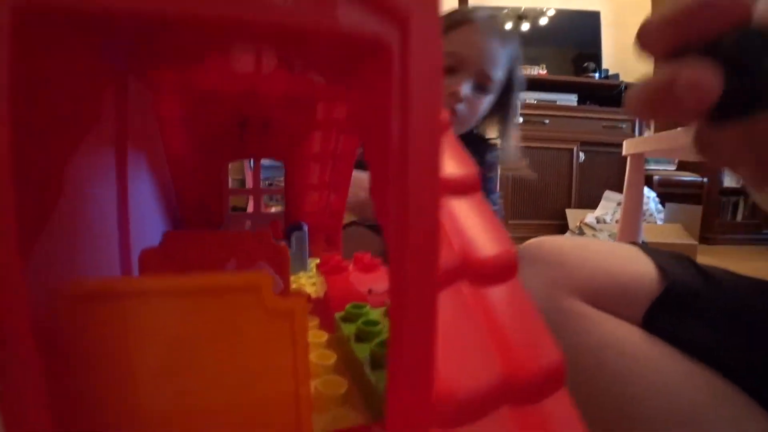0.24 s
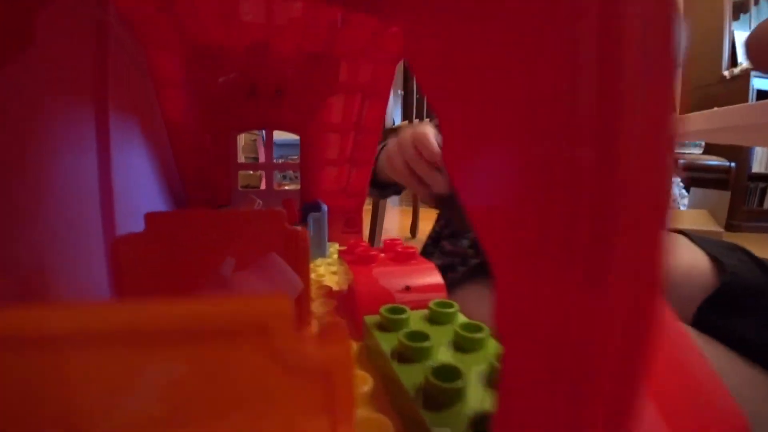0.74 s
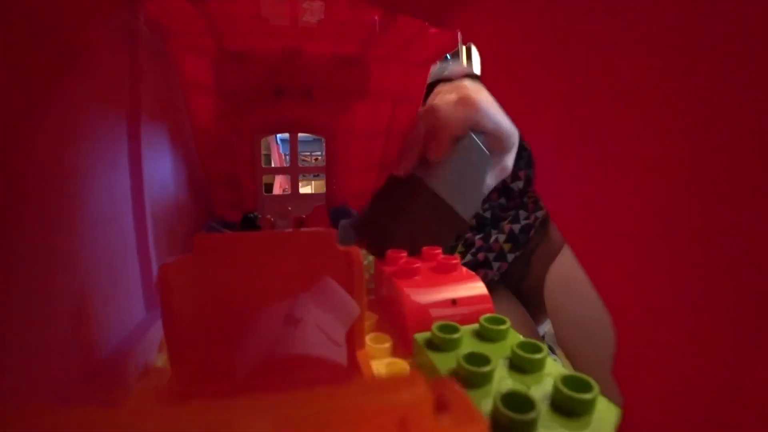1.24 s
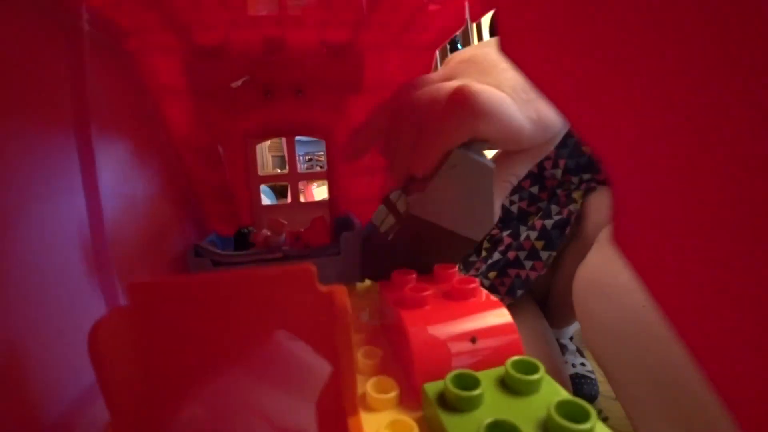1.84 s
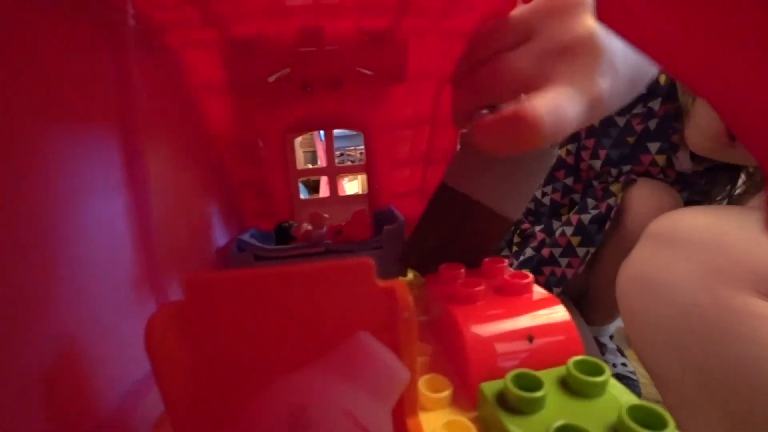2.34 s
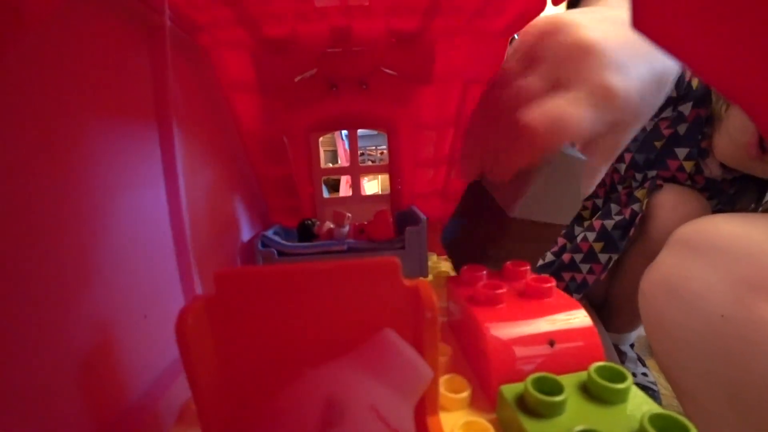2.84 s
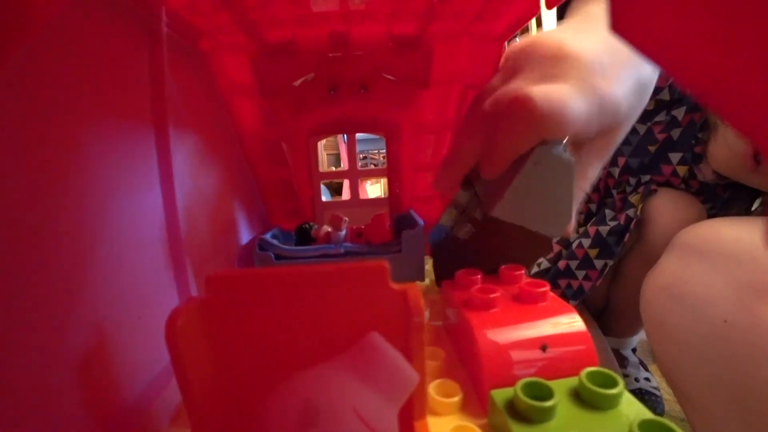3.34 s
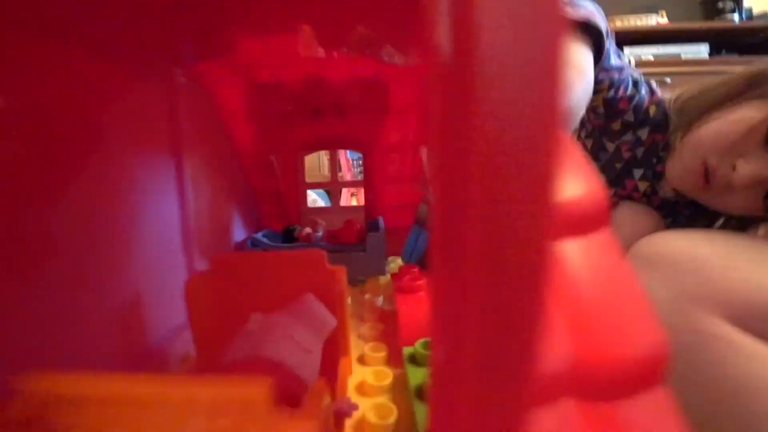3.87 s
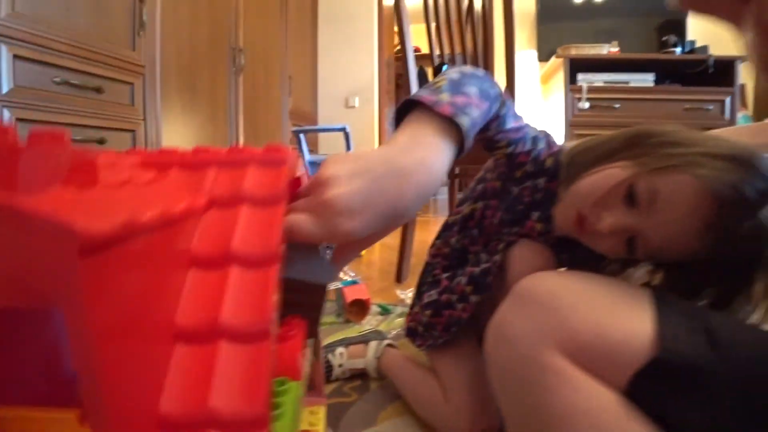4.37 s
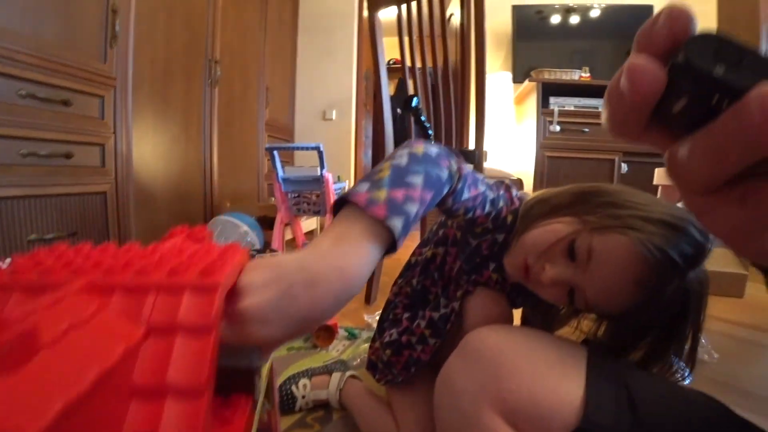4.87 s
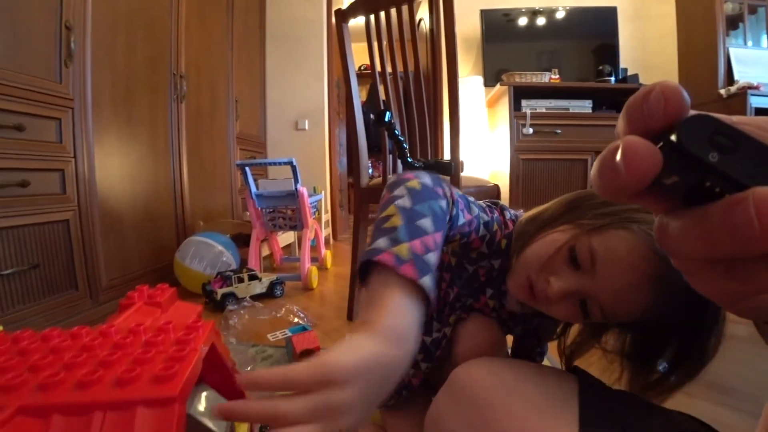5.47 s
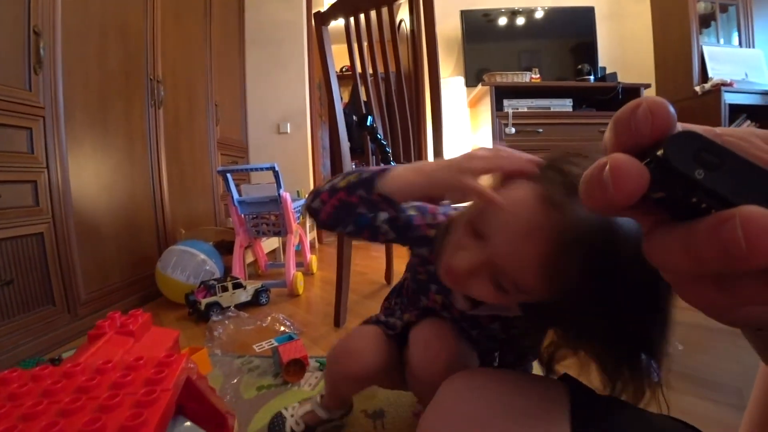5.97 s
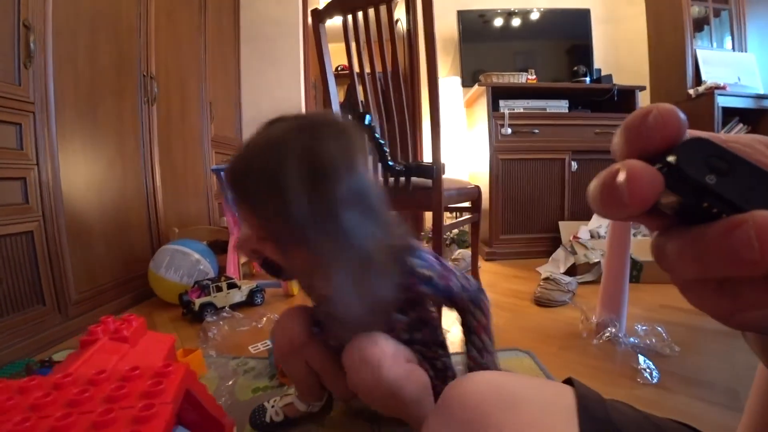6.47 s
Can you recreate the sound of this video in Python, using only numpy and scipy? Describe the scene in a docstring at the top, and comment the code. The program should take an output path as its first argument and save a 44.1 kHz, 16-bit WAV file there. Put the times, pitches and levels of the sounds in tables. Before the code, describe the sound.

A quiet living room, heard through a close stereo microphone: low faint rumble and thin hiss, with a slight rustle from 0.5 s. At about 1 s a hard toy begins knocking inside a hollow plastic playhouse. From 1.1 to 1.9 s the blows come in dense, uneven chatters, boxy and clacky, with gritty scrapes and loose brick rattles between. After a small gap, knocks resume around 2.1-2.6 s, more spaced. At 2.7 s there is a very short, rough squeak. More knocks and scraping pushes follow, with a strong flurry at 3.6-3.8 s. Weaker clicks and a bright knock with a rub come near 4.1 s. From 4.6 to 5.5 s there are light taps, sharpest at 4.9 and 5.3 s. Then it is nearly still, with soft rustling at 5.8 s and tiny ticks at 6.2, 6.3 and 6.6 s. The room adds a short, dull tail.

```python
"""A toy knocks and chatters on the walls and bricks of a hollow plastic playhouse; each blow excites decaying modes.
It scrapes, rattles and briefly squeaks by stick-slip friction, then gives a series of mostly fainter taps.
Fine hiss swells as dense grains of noise: plastic rubbing, treble tails of knocks, perhaps cloth.
A quiet living room answers with a diffuse, decaying tail over low rumble and faint hiss."""
import sys
import numpy as np
from scipy import signal
from scipy.fft import rfft, irfft
from scipy.io import wavfile
from scipy.ndimage import uniform_filter1d

SR = 44100
rng = np.random.default_rng(int(sys.argv[2]) if len(sys.argv) > 2 else 0)


def int16_out(signal):
    """Quantize to a 16-bit WAV file."""
    q = np.round(np.clip(np.atleast_2d(signal).T, -1, 1) * 32767)
    wavfile.write(sys.argv[1], SR, q.astype(np.int16))


N = 295911
TIME = np.arange(N) / SR

# hard knocks on the house: t/s, level/dB, hardness/(dB per octave), extra clack of the thin walls/dB,
# ring time near 1 kHz/s
HARD_KNOCKS = [(0.9833, -25.5, 2.5, -2.5, 0.043), (1.0975, -27.5, 1.5, 7.5, 0.058),
               (1.108, -31.5, -2, 14.5, 0.1), (1.1325, -29.5, -1, 4.5, 0.17),
               (1.208, -23, -4.5, -1.5, 0.083), (1.224, -18.5, -1, 2, 0.11), (1.2422, -25.5, -3.5, 3, 0.11),
               (1.2863, -19.5, 0, 1, 0.12), (1.303, -23, -5, 5, 0.039), (1.3408, -21.5, 0.5, 4, 0.1),
               (1.3632, -19.5, -0.5, 2.5, 0.094), (1.3838, -24, 1.5, 7, 0.08), (1.492, -24, -1.5, 1.5, 0.1),
               (1.5231, -27.5, -4.5, -1.5, 0.053), (1.5913, -26.5, -6.5, 13.5, 0.038),
               (1.6002, -17, 1, -2, 0.083), (1.6541, -22.5, -4, -0.5, 0.067),
               (1.6721, -21.5, 3, -0.5, 0.045), (1.7209, -22, -1.5, 0, 0.067),
               (1.7323, -22, 3.5, -3.5, 0.046), (1.7451, -16, 1, -8.5, 0.068),
               (1.7627, -22.5, 1.5, -2, 0.092), (1.783, -19, -1.5, -2.5, 0.13),
               (1.7963, -21.5, 2, -1, 0.048), (1.8069, -18.5, 0.5, 3, 0.1), (1.9322, -23, 4.5, -1, 0.035),
               (2.1014, -30, 2, 0.5, 0.026), (2.158, -30.5, -0.5, -1, 0.06), (2.1831, -25, -5.5, 3, 0.044),
               (2.2452, -19.5, -2.5, -1.5, 0.049), (2.2553, -17, 3.0, -6, 0.065),
               (2.264, -28, -4, 11.5, 0.1), (2.2771, -21, -1, 0.5, 0.15), (2.3055, -24.5, -2, -5, 0.035),
               (2.4618, -16, -2.5, -3, 0.063), (2.524, -21, -7, -3, 0.053), (2.6173, -21.5, -1.5, 1, 0.098),
               (2.8288, -25.5, -5, -0.5, 0.04), (2.8977, -18.5, 1.0, -2.5, 0.063),
               (2.9085, -22, -0.5, -0.5, 0.06), (3.0325, -18, 3.0, -0.5, 0.067),
               (3.0927, -22, -4, -9, 0.13), (3.2487, -28.5, -4, -8, 0.087), (3.3389, -24, 0.5, -1, 0.023),
               (3.3498, -18, -1, 0, 0.12), (3.3725, -19, -1, -1, 0.09), (3.564, -29, -4.5, -8, 0.17),
               (3.5859, -19.5, -1, 1, 0.13), (3.5985, -20.5, 1, -19, 0.078), (3.621, -23.5, 1, 7.5, 0.092),
               (3.6463, -19.5, -1.5, 4, 0.065), (3.73, -18.5, 0.5, -2, 0.077), (3.7413, -16, 1, -6.5, 0.13),
               (3.7677, -18.5, 2, -4.5, 0.049), (3.8299, -39.5, -2, 8.5, 0.032),
               (3.9318, -37.5, 2.5, -1, 0.078), (3.9954, -36, -2.0, 2, 0.059),
               (4.0228, -43.5, 2.5, 0.5, 0.084), (4.132, -24, 5.5, 3, 0.043), (4.1415, -31, 4.5, 7.5, 0.13),
               (4.2673, -36, -2, 4.5, 0.05), (4.3657, -43.5, -2.5, -2.5, 0.12),
               (4.4829, -30.5, 3.5, 7.5, 0.15), (4.4964, -32.5, -2, 10, 0.021), (4.5141, -39, -4, 3, 0.023)]
# ordinary knock in thump, hollow, knock, clack and snap bands: level/dB re the knock
KNOCK_BAND_DB = [-2, 3.2, 2.86, -1.5, -8.5]
# share of the extra clack in the same five bands: share/1
CLACK_BAND_SHARE = [0.14, 0.084, 0.98, 1, 0]
SOFT_CONTACT_HZ = 563  # below this, hardness tilts the spectrum no further


def knocks():
    """Impact excitation: a hard corner rings brighter, and a blow mid-wall clacks more."""
    s, db, hardness, clack_db, ring_s = np.transpose(HARD_KNOCKS)
    edges = np.array(BAND_LIMITS_HZ)
    centres = np.sqrt(edges[:-1] * edges[1:])
    octave = np.log2(np.maximum(centres, SOFT_CONTACT_HZ) / 1000)
    hardness_db = np.outer(hardness, octave)
    band_db = db[:, None] + KNOCK_BAND_DB + hardness_db + np.outer(clack_db, CLACK_BAND_SHARE)
    return strike(s, band_db, blows(ring_s))


# limits of the thump, hollow, knock, clack and snap bands: f/Hz
BAND_LIMITS_HZ = [80, 450, 900, 1500, 3800, 11000]


def strike(times, band_db, rings, size=256):
    """Contact hardness: each blow's spectrum is set by the loudest moment of its ring in five bands."""
    shaped = 0
    for k in range(len(BAND_LIMITS_HZ) - 1):
        part = band(rings, BAND_LIMITS_HZ[k], BAND_LIMITS_HZ[k + 1])
        loudest = np.sqrt(uniform_filter1d(part[0] ** 2, size).max(axis=1))  # short-time rms of mid
        shaped = shaped + part * (undb(band_db[:, k]) / loudest)[:, None]
    out = np.zeros((2, N + rings.shape[-1]))
    for k, s in enumerate(times):
        start = int(s * SR)
        out[:, start:start + rings.shape[-1]] += shaped[:, k]
    return out[:, :N]


# main modes of the house and its air: f/Hz, relative level/dB, free decay time t60/s
HOUSE_MODES = [(104.1, -15.5, 0.2), (194, -12, 0.2), (308.8, -6.5, 0.14), (381.8, -10, 0.14),
               (600.3, 5.5, .14), (686.5, 0, 0.15), (814, -19, 0.1), (1023, -2.5, 0.063), (1157, 12, 0.065),
               (1258.6, 1, 0.17), (1646, 0.5, 0.075), (2008, -12.5, 0.15), (2416, 4, 0.071),
               (2726, -30, .05), (3460, 1, 0.057), (4560, -19.5, 0.0295), (5930, -3.5, 0.036),
               (6520, -8, 0.059), (7200, -13, 0.053), (7820, -13, 0.049)]
# spectrum of the countless small overlapping modes of the walls: f/Hz, relative level/dB
PANEL_SPECTRUM = [(80, -8.5), (250, -3.5), (600, 1.5), (1200, -4), (2000, 0), (3400, -4), (4600, -12),
                  (6000, -9), (8000, -17), (11000, -17)]


def blows(ring_s, panels_db=13, ripple_db=6, ripple_hz=230, damping=0.17, spread_db=5, detune=0.024,
          rise_s=0.0005, side_db=-8, free_ring_s=0.065, size=12288):
    """Modal superposition: one ring per blow, as (mid or side, blow, sample), with modes set by contact point."""
    t, count = np.arange(size) / SR, len(ring_s)
    ring_s = np.maximum(ring_s, 0.008)[:, None]
    noise = colour(rng.standard_normal((count, 2, size)), PANEL_SPECTRUM).swapaxes(0, 1)
    contact_gain = undb(ripple_db * ripple((count,), ripple_hz, size))
    noise = unit(irfft(rfft(noise) * contact_gain))
    # plastic loses its high modes first
    panels = sum(b * fade(t, ring_s * (hz / 1000) ** -damping) for hz, b in octaves(noise))
    out = undb(panels_db) * panels
    out[1] *= undb(side_db)
    # a toy that stays pressed on the wall also shortens the main modes
    damped_t = (t * np.maximum(free_ring_s / ring_s, 1)).astype(np.float32)
    for hz, db, t60 in HOUSE_MODES:
        weight, shift, sign = rng.standard_normal((count, 3)).T[:, :, None]
        swing = np.sin((2 * np.pi * hz * (1 + detune * shift) * t).astype(np.float32))
        gain = np.sign(sign) * undb(db + spread_db * np.minimum(weight, 1))
        out[0] += gain * swing * fade(damped_t, t60)
    return out * (1 - np.exp(-t / rise_s))


# light taps: t/s, peak level/dB, snap level/dB re peak
LIGHT_TAPS = [(4.623, -37.5, -22), (4.706, -40, -30), (4.82, -37.5, -3.5), (4.855, -40, -6.5),
              (4.88, -25.5, -28), (4.901, -45, -7), (4.923, -33.5, -18.5), (5.008, -30, -15.5),
              (5.02, -33.5, -21), (5.1, -35.5, -18), (5.118, -37, -10.5), (5.141, -41, -15),
              (5.164, -35, -15), (5.189, -33, -14), (5.263, -48, -21), (5.321, -22, -19.5),
              (5.334, -31, -12.5), (5.438, -33, -16.5), (5.515, -38, -21), (6.172, -44, -11.5),
              (6.275, -46.5, -7), (6.583, -42.5, -5.5)]
# tap in thump, hollow, knock and clack bands: level/dB re peak
TAP_BAND_DB = [-16.5, -13, -14.5, -13]


def taps(ring_s=0.061, delay_s=0.002):
    """Light impact excitation, each tap starting a short fixed delay after its listed time."""
    s, peak_db, snap_db = np.transpose(LIGHT_TAPS)
    tap_band_db = np.column_stack([np.tile(TAP_BAND_DB, (len(s), 1)), snap_db])
    return strike(s + delay_s, peak_db[:, None] + tap_band_db, blows(np.full(len(s), ring_s)))


# grit of plastic on plastic: f/Hz, relative level/dB
GRIT_SPECTRUM = [(80, -16), (300, 9.5), (700, 11.5), (1300, -5), (2500, -3), (4500, -22), (7000, -14),
                 (11000, -40.5)]


def scrape(grit_db=4, shift_db=4, size=8192):
    """Stick-slip friction: sliding sends a stream of slips into the larger modes of the house."""
    t = np.arange(size) / SR
    force = slips(per_second=900, scatter_db=3)
    # sliding contact halves the decay times
    modes = sum(undb(db) * np.sin(2 * np.pi * hz * t) * fade(t, t60 / 2)
                for hz, db, t60 in HOUSE_MODES if hz < 2200)
    ring = signal.oaconvolve(force, modes)[:N]
    # every slip is smeared for a few milliseconds by the thin walls
    smear = rng.standard_normal(size) * fade(t, t60=0.019)
    grit = colour(signal.oaconvolve(force, smear)[:N], GRIT_SPECTRUM)
    return travel(unit(ring) + undb(grit_db) * unit(grit), shift_db, spacing_hz=169.3) * sliding()


def rattle(rattle_db=-7, ring_s=0.024, shift_db=4, size=4096):
    """Random impact noise: loose bricks tick irregularly while the toy slides past them."""
    tick = colour(rng.standard_normal(size), PANEL_SPECTRUM) * fade(np.arange(size) / SR, ring_s)
    ticks = signal.oaconvolve(slips(per_second=140, scatter_db=3), tick)[:N]
    return travel(ticks, shift_db, spacing_hz=399, size=1024) * undb(rattle_db) * sliding()


# deliberate pushes of the toy along the plastic: start t/s, length/s, level/dB
TOY_PUSHES = [(1.12, 0.2, -33), (1.52, 0.16, -33), (2.11, 0.075, -34.5), (2.31, 0.14, -39.5),
              (2.55, 0.16, -32.5), (2.94, 0.12, -29.5), (3.11, 0.078, -58), (3.37, 0.081, -30),
              (3.66, 0.087, -31), (4.08, 0.16, -38), (4.84, 0.12, -46), (5.11, 0.11, -47.5),
              (5.24, 0.17, -48.5)]
PUSH_ATTACK = 0.32  # share of a push spent swelling


def sliding():
    """Power addition: skids and pushes combine into the strength of the sliding contact."""
    return np.hypot(skid(), swells(TOY_PUSHES, PUSH_ATTACK))


# SKID_DB is re the knock at the usual ring; the rise is a time constant, the decay a t60
SKID_DB, SKID_RISE_S, SKID_T60_S = -17.5, 0.02, 0.49
USUAL_RING_S = 0.089  # a toy that lands dead rings shorter than this and skids less


def skid():
    """Frictional damping: every knock sets the toy sliding, and friction stops it."""
    t, power = np.arange(SR) / SR, np.zeros(N + SR)
    glide = (1 - np.exp(-t / SKID_RISE_S)) * fade(t, SKID_T60_S)
    for s, db, _, _, ring_s in HARD_KNOCKS:
        start = int(s * SR)
        power[start:start + SR] += (undb(db + SKID_DB) * ring_s / USUAL_RING_S * glide) ** 2
    return np.sqrt(power[:N])


# the sliding edge catches and squeaks: t/s, level/dB
SQUEAK_LEVEL = [(2.69, -42), (2.709, -29.5), (2.716, -20), (2.726, -23), (2.728, -16.5), (2.741, -31),
                (2.754, -51), (2.78, -74)]
# the wall's response to the squeak: f/Hz, relative level/dB
SQUEAK_SPECTRUM = [(150, -22), (350, -2.5), (870, -9), (1000, 3), (1270, 5.5), (1380, -25), (2400, -13),
                   (2600, -20), (3900, -30), (8000, -55)]


def squeak():
    """Resonant stick-slip: a quick run of slips rings narrow ranges of the wall in a short, rough squeak."""
    s, db = np.transpose(SQUEAK_LEVEL)
    tone = unit(colour(slips(per_second=5500, scatter_db=0), SQUEAK_SPECTRUM))
    return tone * np.interp(TIME, s, undb(db), left=0, right=0)


# swells of fine hiss (plastic rubbing, treble tails of knocks, perhaps cloth): start t/s, length/s, level/dB
HISS_SWELLS = [(0.48, 0.59, -56.5), (1.05, 0.37, -44), (1.5, 0.14, -51.5), (2.04, 0.14, -48),
               (2.13, 0.29, -46), (2.39, 0.26, -46), (2.68, 0.068, -49.5), (2.92, 0.32, -50.5),
               (3.22, 0.062, -47.5), (3.31, 0.068, -41), (3.45, 0.98, -55), (4.12, 0.15, -42),
               (5.77, 0.26, -51), (6.19, 0.37, -58.5), (6.49, 0.3, -54)]
# spectrum of the fine hiss: f/Hz, relative level/dB
HISS_SPECTRUM = [(300, 2), (900, -3), (2000, -0.5), (3700, 0), (5200, -3), (7000, -1.5), (11000, -8)]
HISS_ATTACK = 0.23  # share of a hiss swell spent rising
HISS_FLOOR_DB = -64  # the fine hiss never quite stops


def fine_hiss(side_db=-5, shift_db=4):
    """Dense impulse noise: countless fine grains merge to a swelling hiss whose colour keeps shifting."""
    grains = np.array([slips(per_second=9000, scatter_db=-2.5) for _ in range(2)])
    hiss = travel(colour(grains, HISS_SPECTRUM), shift_db, spacing_hz=440)
    envelope = np.hypot(swells(HISS_SWELLS, HISS_ATTACK), undb(HISS_FLOOR_DB))
    return hiss * undb([[0], [side_db]]) * envelope


def slips(per_second, scatter_db):
    """Random impulse process: tiny releases of unequal size, at rms 1."""
    releases = rng.random(N) < per_second / SR
    return unit(releases * rng.standard_normal(N) * undb(scatter_db * rng.standard_normal(N)))


def swells(rows, attack, fullness=0.84):
    """Amplitude envelope: each (start, length, level) row swells smoothly and dies away."""
    attack = np.clip(attack, 0.05, 0.95)
    power = 0
    for start, length, db in rows:
        rise_and_fall = np.interp(TIME, start + length * np.array([0, attack, 1]), [0, 1, 0])
        power = power + (undb(db) * np.sin(np.pi / 2 * rise_and_fall) ** fullness) ** 2
    return np.sqrt(power)


def ripple(shape, spacing_hz, length):
    """Modal coupling: random peaks and dips along frequency, as one contact point favours or misses modes."""
    place = np.fft.rfftfreq(length, 1 / SR) / spacing_hz
    knots, index = rng.standard_normal((*shape, 1024)), place.astype(int) % 1023
    return knots[..., index] * (1 - place % 1) + knots[..., index + 1] * (place % 1)


def travel(x, depth_db, spacing_hz, size=4096):
    """Time-varying coupling: peaks and dips keep shifting, as when a sliding contact moves from place to place."""
    frames = signal.stft(x, nperseg=size)[2]
    shifts = ripple(frames.shape[-1:], spacing_hz, size).T
    moved = signal.istft(frames * undb(depth_db * shifts), nperseg=size)[1]
    return unit(moved[..., :N])


# reverberation time of the room: f/Hz, t60/s
ROOM_DECAY = [(100, 0.69), (400, 0.3), (1300, 0.35), (4000, 0.55), (10000, 0.1)]


def room(x, wet_db=-13, side_db=-5, build_s=0.0027, size=32768):
    """Diffuse reverberation: furniture and walls return a short, dull tail, as mid and side."""
    t = np.arange(size) / SR
    # f/Hz, relative level/dB
    spectrum = [(60, -20), (120, -2.5), (300, 6.0), (1200, -7), (3500, -14.0), (6000, -12.0), (11000, -4)]
    noise = colour(rng.standard_normal((2, size)), spectrum)
    tail = sum(b * fade(t, at(ROOM_DECAY, hz)) for hz, b in octaves(noise))
    tail = tail * (1 - np.exp(-(t / build_s) ** 2))
    tail *= undb([[wet_db], [wet_db + side_db]]) / np.sqrt(np.sum(fade(t, at(ROOM_DECAY, 1000)) ** 2))
    return signal.fftconvolve(x[None], tail, axes=1)[:, :N]


# still room: f/Hz, relative density/(dB per Hz)
AIR_SPECTRUM = [(20, -3.5), (45, 1.5), (80, -8.5), (160, -8), (350, -14.5), (700, -17.5), (1500, -24),
                (4000, -32.5), (11000, -34.5)]
AIR_DB = -56.5


def air():
    """Stationary background noise: low room rumble, alike on both sides, under a wider faint hiss."""
    mid, side = unit(colour(rng.standard_normal((2, N)), AIR_SPECTRUM))
    wide = colour(side, [(40, -18), (300, 4.0), (2000, 9.5), (8000, -1)])
    return undb(AIR_DB) * np.array([mid, wide])


def undb(db):
    """Logarithmic level: decibels to amplitude gain."""
    return 10 ** (np.asarray(db) / 20)


def unit(x):
    """Effective value: scale to rms 1."""
    return x / np.sqrt(np.mean(x ** 2))


def curve(rows):
    """Linear interpolation: join (t/s, value) rows by straight lines."""
    return np.interp(TIME, *np.transpose(rows))


def at(rows, hz):
    """Logarithmic pitch scale: read (f/Hz, value) rows on a log-frequency axis."""
    f, v = np.transpose(rows)
    return np.interp(np.log(np.maximum(hz, 1)), np.log(f), v)


def colour(x, rows):
    """Spectral shaping: weight a sound by (f/Hz, level/dB) rows."""
    gain = undb(at(rows, np.fft.rfftfreq(x.shape[-1], 1 / SR)))
    return irfft(rfft(x) * gain, x.shape[-1])


def band(x, lo, hi, order=3):
    """Causal filtering: Butterworth band-pass."""
    sos = signal.butter(order, [lo, min(hi, SR / 2 - 1)], "band", fs=SR, output="sos")
    return signal.sosfilt(sos, x)


def fade(t, t60):
    """Exponential decay: 60 dB in t60 seconds."""
    return np.exp(-np.log(1000) * t / t60)


def octaves(x):
    """Octave analysis: overlapping bands that sum to the sound, as (f/Hz, band) pairs."""
    centres = 100 * 2. ** np.arange(8)
    place = np.log(np.maximum(np.fft.rfftfreq(x.shape[-1], 1 / SR), 1))
    spectrum = rfft(x)
    pairs = []
    for hz, w in zip(centres, np.eye(len(centres))):
        weight = np.interp(place, np.log(centres), w)
        pairs.append((hz, irfft(spectrum * weight, x.shape[-1])))
    return pairs


# where the handling is: t/s, left minus right level/dB
HANDLING_PLACE = [(0, -4), (1.1, 1.4), (2.2, 0.5), (3.7, 1), (4.15, 2.5), (4.6, 3), (5.4, 2.5), (5.9, 1),
                  (6.7, 0.5)]
# the right microphone port hears the house a little sooner: f/Hz, phase lead/rad
RIGHT_PORT_LEAD = [(150, 0), (400, 0.09), (780, 0.92), (1500, 0.67), (2500, 0.85), (6500, 0.72),
                   (11000, 0.69)]


def scene(room_bass_side_db=-5):
    """Superposition and stereo imaging: sources, room tail and air go from mid and side to left and right."""
    near = knocks() + taps() + fine_hiss()
    near[0] += scrape() + rattle() + squeak()
    tail = room(near[0])
    # long waves reach both ports alike
    for sound in (near, tail):
        sound[1] = colour(sound[1], [(200, room_bass_side_db), (1500, 0.022)])
    to_ears = np.array([[1, 0.69], [1, -0.68]])
    sides = np.array([[1], [-1]]) / 2  # half of each difference goes to each side
    lead = np.exp(-1j * sides * at(RIGHT_PORT_LEAD, np.fft.rfftfreq(N, 1 / SR)))
    direct = irfft(rfft(to_ears @ near) * lead, N) * undb(sides * curve(HANDLING_PLACE))
    return direct + to_ears @ (tail + air())


TOP_HZ = 11150


def record(dry):
    """Band limitation: a zero-phase elliptic low-pass cuts the top steeply."""
    return signal.sosfiltfilt(signal.ellip(8, .1, 45, TOP_HZ, fs=SR, output="sos"), dry)


dry = scene()
out = record(dry)
int16_out(out)
```